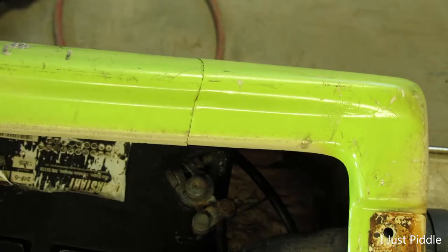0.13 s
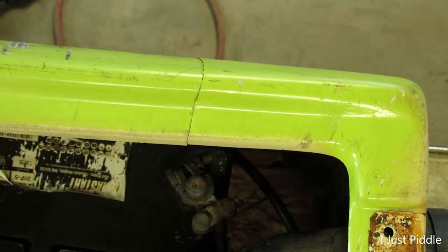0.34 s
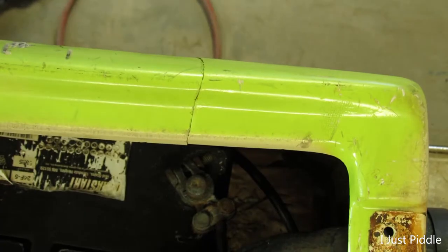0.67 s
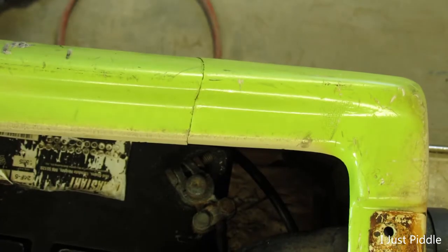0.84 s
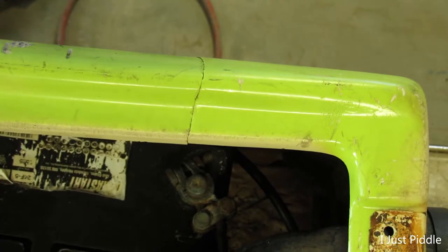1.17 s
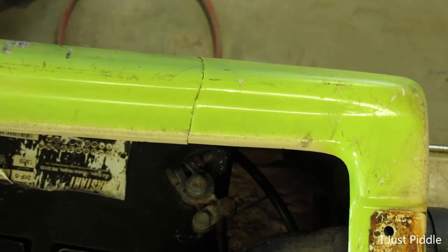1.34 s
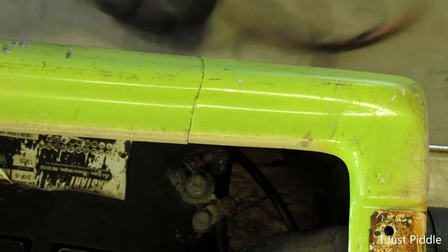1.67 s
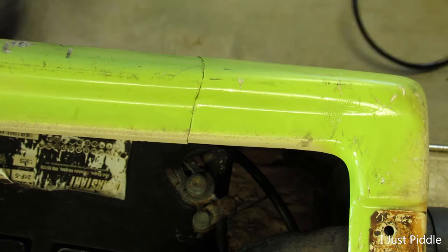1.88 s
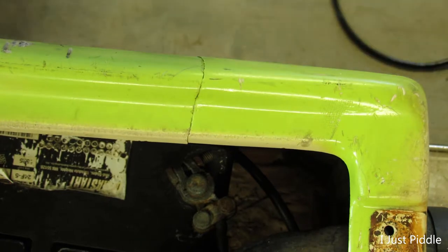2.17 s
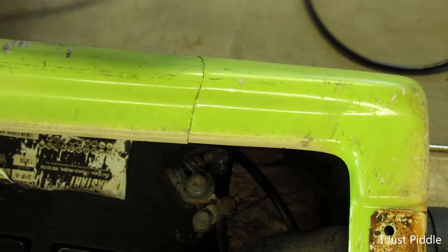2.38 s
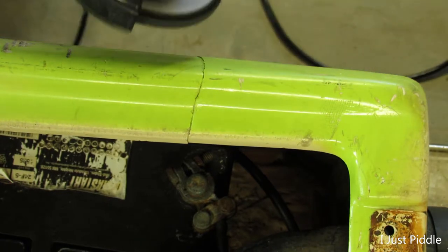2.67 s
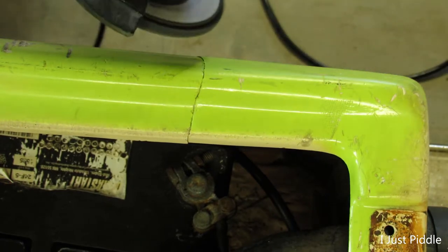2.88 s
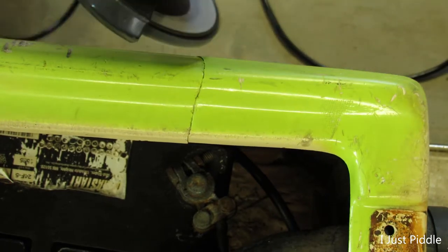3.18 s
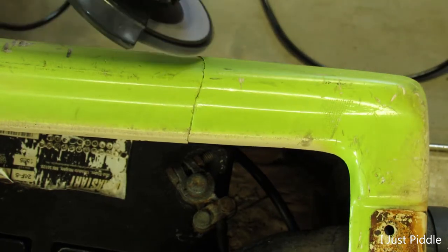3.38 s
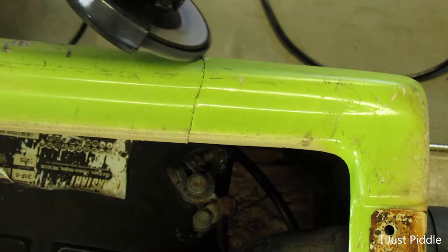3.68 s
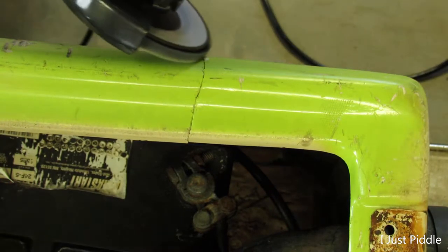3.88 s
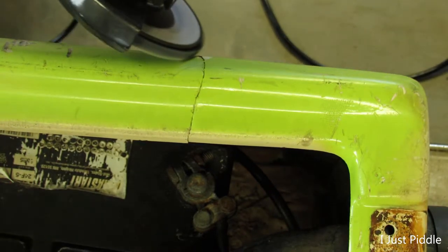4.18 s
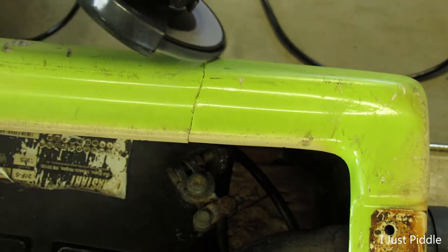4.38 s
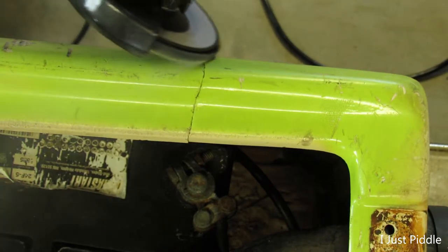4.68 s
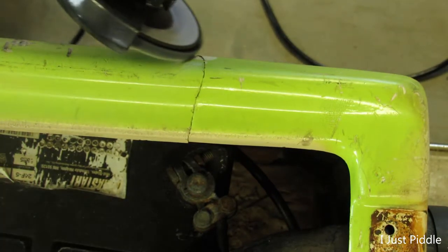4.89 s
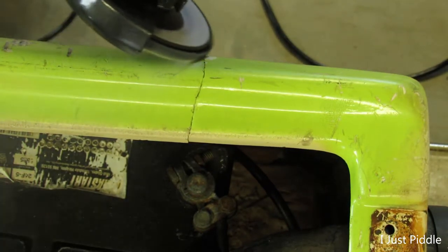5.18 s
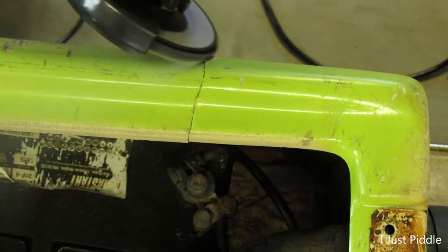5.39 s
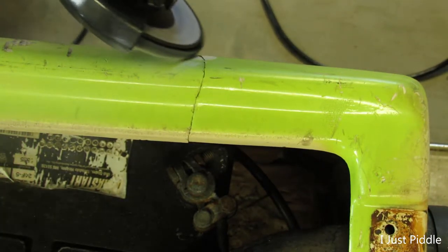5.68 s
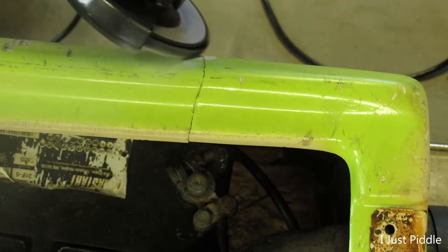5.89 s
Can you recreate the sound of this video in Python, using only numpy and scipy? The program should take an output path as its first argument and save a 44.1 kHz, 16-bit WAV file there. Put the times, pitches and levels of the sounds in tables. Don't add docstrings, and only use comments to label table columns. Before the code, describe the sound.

In a quiet humming workshop, cloth rustles and a tick falls, then an angle grinder kicks on, spins up roaring and grinds a fiberglass panel in short hissing strokes.

```python
import sys
import numpy as np
from scipy import signal
from scipy.fft import rfft, irfft
from scipy.io import wavfile
from scipy.ndimage import uniform_filter1d, map_coordinates

SR = 44100
rng = np.random.default_rng(int(sys.argv[2]) if len(sys.argv) > 2 else 0)


def to_wav(s):
    ch = np.atleast_2d(s).T
    pcm = np.round(np.clip(ch, -1, 1) * 32767)
    wavfile.write(sys.argv[1], SR, pcm.astype(np.int16))


def volts_from_db(level):
    exponent = np.asarray(level, float) / 20
    return 10 ** exponent


N = 266364
T = np.arange(N) / SR
SWITCH_S = .5267
MAINS_PULSES_HZ = 120
PINION_TEETH, GEARING = 12, 12 / 37


def rms_one(x):
    return x / np.sqrt(np.mean(x ** 2) + 1e-20)


def in_time(rows):
    s, *columns = np.transpose(rows)
    return [np.interp(T, s, c) for c in columns]


def at_hz(points, hz):
    points = np.array(points)
    return np.interp(np.log(hz), np.log(points[:, 0]), points[:, 1])


def ramp(start_s, length_s):
    return np.clip((T - start_s) / length_s, 0, 1)


def butter(x, order, hz, kind="low"):
    return signal.sosfilt(signal.butter(order, hz, kind, fs=SR, output="sos"), x)


def drift(rate_hz):
    r = np.exp(-2 * np.pi * rate_hz * 40 / SR)
    slow = signal.lfilter([1], [1, -2 * r, r * r], rng.standard_normal(N // 40 + 2002))
    slow = rms_one(slow[2000:])
    return np.interp(np.arange(N) / 40, np.arange(len(slow)), slow)


def swells(rows, edge=2):
    out = np.zeros(N)
    for s, half, db in rows:
        a, b = max(int((s - 3.5 * half) * SR), 0), int((s + 3.5 * half) * SR)
        out[a:b] += volts_from_db(db) * np.exp(-np.abs((T[a:b] - s) / half) ** edge)
    return out


def bursts(clicks, rise_s, fall_s):
    for s in (rise_s, fall_s):
        clicks = signal.lfilter([1], [1, -np.exp(-1 / (s * SR))], clicks + 1e-18)
    return clicks / (min(rise_s, fall_s) * SR)


def resonate(x, modes):
    out = 0
    for k, (hz, width_hz, db) in enumerate(modes):
        r = np.exp(-np.pi * width_hz / SR)
        b = (1 - r * r) / 2 * np.array([1, 0, -1])
        a = [1, -2 * r * np.cos(2 * np.pi * hz / SR), r * r]
        out = out + (-1) ** k * volts_from_db(db) * signal.lfilter(b, a, x)
    return out


# (frequency [Hz], likeness [0-1])
ALIKE = [(60, 0.69), (150, 0.49), (380, 1), (950, 0.99), (2380, 0.73), (5980, 0.88), (15000, 0.63)]
# (frequency [Hz], level [dB])
LEAN_DB = [(60, 0.0), (150, -13), (380, 6.5), (950, 0), (2380, 1.5), (5980, 1.5), (15000, 0)]


def coloured(colour_db, drive, patchy_db):
    noise = rng.standard_normal((2, len(drive))) * drive
    hz, s, (mid, side) = signal.stft(noise, SR, nperseg=1024)
    hz = np.maximum(hz, 10)[:, None]
    at = np.clip((s * SR).astype(int), 0, N - 1)
    gain = volts_from_db(colour_db(hz, at)) * np.ones(mid.shape)
    gain /= np.sqrt(np.mean(gain ** 2, axis=0))
    field = rng.standard_normal((60, 100))
    patches = map_coordinates(field, np.broadcast_arrays(5 * np.log2(hz / 10), 12 * s), order=1)
    alike = np.clip(at_hz(ALIKE, hz), 0, 1)
    lean = volts_from_db(at_hz(LEAN_DB, hz) / 2)
    mid, side = np.sqrt((1 + alike) / 2) * mid, np.sqrt((1 - alike) / 2) * side
    both = np.array([(mid + side) * lean, (mid - side) / lean]) * gain * volts_from_db(patchy_db * patches)
    return signal.istft(both, SR, nperseg=1024)[1][:, :len(drive)]


# (frequency [Hz], level [dB per Hz])
RUMBLE = [(20, -28), (45, -9), (84, -9), (120, -11.5), (167, -14), (200, -14.5), (270, -19.5), (756, -23.5),
          (1500, -24)]


def shop_hum():
    f = np.maximum(np.arange(N // 2 + 1) * SR / N, 1)
    shape = volts_from_db(at_hz(RUMBLE, f)) * (f < 1500)
    mid, side = (irfft(rfft(rng.standard_normal(N)) * shape, N) for k in range(2))
    rumble = volts_from_db(-62) * rms_one(mid + .47 * side * [[1], [-1]])
    ducked_db = -13 * ramp(.53, 0.047) - 4 * ramp(.6, 1.1)
    fridge_hz, fridge_db = 82, -66
    hum = volts_from_db(fridge_db + ducked_db / 4 + 0.59 * drift(12)) * np.sin(2 * np.pi * fridge_hz * T)
    return volts_from_db(ducked_db) * (rumble + hum * [[1.7], [1.2]])


def walls(x, t60, dull_hz):
    t = T[:SR // 2]
    tail = rng.standard_normal((2, len(t))) * volts_from_db(-60 * t / t60) * (t > .004)
    tail = butter(tail, 1, dull_hz)
    return signal.fftconvolve(x, tail / np.sqrt(np.sum(tail ** 2) / 2), axes=1)[:, :N]


# (centre [s], half length [s], rustle [dB], dull share [dB])
CLOTH_MOVES = [
    (0, .03, -53.5, 0),
    (.14, 0.032, -57, -10),
    (.308, .018, -52.5, -20),
    (0.497, 0.033, -52, 0.5),
]
# (frequency [Hz], level [dB per Hz])
CLATTER_COLOUR = [(180, -47), (300, -37), (723, -21), (818, -12), (1000, -6.5), (2340, 0.5), (5060, -6),
                  (12000, -30), (15600, -58), (22000, -120)]
# (frequency [Hz], level [dB per Hz])
RUSTLE_COLOUR = [(880, -42), (1500, -10), (2640, -21), (4040, -8), (8160, -4), (9010, -6), (10200, -9),
                 (16000, -17)]
# (time [s], peak [dB])
HAND_TICKS = [
    (0.2705, -31),
    (0.386, -52),
]


def hand():
    start_db, fall_db_per_s, rest_db = -46.5, 87, -73
    fading = volts_from_db(start_db - fall_db_per_s * T) + volts_from_db(rest_db)
    dull = fading + swells([(s, half, db + dull_db) for s, half, db, dull_db in CLOTH_MOVES])
    cloth = swells([row[:3] for row in CLOTH_MOVES]) + volts_from_db(-85)
    dull, cloth = dull * volts_from_db(0.86 * drift(60)), cloth * volts_from_db(1.3 * drift(80))
    clatter = coloured(lambda hz, at: at_hz(CLATTER_COLOUR, hz), dull[:SR], patchy_db=-1.0)
    rustle = coloured(lambda hz, at: at_hz(RUSTLE_COLOUR, hz), cloth[:SR], patchy_db=1.5)
    clicks = np.zeros(N)
    for s, db in HAND_TICKS:
        clicks[round(s * SR)] = volts_from_db(db - 7)
    tick = rng.standard_normal(N) * bursts(clicks, .0004, 0.0027)
    tick = signal.lfilter([.3, -.3], [1, -1.5, .6], tick)
    return (np.pad(clatter + rustle, [(0, 0), (0, N - SR)]) + tick) * (T < SWITCH_S)


# (octave centre [Hz], level [dB], t60 [s])
JOLT_BANDS = [
    (600, -43, .14),
    (1100, -35, .1),
    (2400, -22, .06),
    (4500, -26, .06),
]


def jolt():
    t = np.maximum(T - SWITCH_S, 0)[:SR]
    kick = 0
    for hz, db, t60 in JOLT_BANDS:
        noise = rng.standard_normal((2, SR)) + rng.standard_normal(SR)
        kick = kick + volts_from_db(db - 60 * t / t60) * rms_one(butter(noise, 2, [hz / 1.5, hz * 1.5], "band"))
    return np.pad(kick * (t > 0), [(0, 0), (0, N - SR)])


# (time [s], speed [turns/s])
ARMATURE_SPEED = [(.53, 172), (.655, 218), (.79, 327), (.9, 366), (1.02, 397), (1.15, 420), (1.32, 440),
                  (1.63, 464), (2.11, 481), (2.4, 488), (3.55, 497), (3.7, 489), (3.88, 488), (4.02, 478),
                  (4.23, 470), (4.75, 463), (5.15, 455), (6.04, 443)]


def armature():
    return in_time(ARMATURE_SPEED)[0]


def turns(per_s):
    return 2 * np.pi * np.cumsum(per_s) / SR


# (time [s], armature tone [dB], spindle tone [dB])
UNBALANCE_DB = [(.9, -49.5, -75), (1.15, -50, -70), (1.4, -47.5, -62), (1.75, -48, -59), (1.95, -48, -63.5),
                (2.45, -52.5, -66), (2.75, -52.5, -64), (3.2, -52, -60.5), (3.57, -51.5, -57),
                (4.0, -51.5, -62), (4.2, -48, -62), (4.3, -48.5, -61), (4.47, -46, -59.5), (4.8, -45, -60),
                (5.43, -48, -57.5), (5.5, -51.5, -59), (5.9, -53.5, -63), (6.04, -55, -61)]
# (centre [s], half length [s], loss [dB])
SPINDLE_STALLS = [
    (3.69, 0.052, 22),
    (3.925, .03, 9),
]
# (time [s], level [dB])
THIRD_ORDER_DB = [(1.0, -66), (2.0, -60), (3.5, -60), (4.1, -61), (4.5, -54), (5.0, -62), (5.5, -64),
                  (6.04, -65)]
# (centre [s], half length [s], level [dB])
DISC_WOBBLES = [(1.3, .15, -74), (2.28, 0.075, -73), (2.74, 0.064, -71), (3.14, .08, -72), (3.52, 0.1, -65),
                (3.82, .05, -71), (4.06, 0.15, -61.5), (4.45, .1, -63), (4.74, 0.057, -69),
                (5.08, 0.16, -67), (5.36, 0.14, -69), (5.8, 0.13, -75), (6.02, 0.07, -75)]


def shafts():
    motor = armature()
    spindle = turns(GEARING * motor)
    motor_db, once_db = in_time(UNBALANCE_DB)
    once_db = once_db - sum(db * np.exp(-((T - s) / half) ** 2) for s, half, db in SPINDLE_STALLS)
    fast = volts_from_db(motor_db + 0.2 + 0.68 * drift(14)) * np.sin(turns(motor)) * ramp(.61, 0.46) ** 2
    beat = turns((1 - 3 * GEARING) * motor)
    cancel_s = 4.35
    third = np.sin(turns(motor) - beat + np.interp(cancel_s, T, beat))
    fast -= volts_from_db(in_time(THIRD_ORDER_DB)[0]) * third * ramp(.9, .2)
    slow = volts_from_db(once_db - 1.4 + 1.2 * drift(7.7)) * np.sin(spindle)
    slow += (swells(DISC_WOBBLES) + volts_from_db(-79.5)) * volts_from_db(2.0 * drift(13)) * np.sin(2 * spindle)
    slow *= ramp(.8, 0.26)
    return np.sqrt(2) * (fast * volts_from_db([[1.2], [-1.2]]) + slow * volts_from_db([[1.4], [-1.4]]))


# (centre [s], half length [s], hiss [dB], flap note over its usual share [dB])
TOUCHES = [(3.61, 0.023, -21.5, -3), (3.692, 0.051, -26, -6), (3.87, 0.044, -41, -3),
           (3.941, 0.048, -25.5, -4), (4.07, 0.082, -30.5, -2), (4.13, 0.022, -26.5, 5),
           (4.214, 0.053, -30.5, -2), (4.319, 0.031, -27.5, 2.5), (4.374, 0.031, -26.5, -9),
           (4.44, 0.042, -28, -5), (4.513, 0.029, -24.5, 0), (4.699, 0.038, -22.5, -7),
           (4.773, 0.032, -25.5, -11), (4.862, 0.017, -34, 6), (5.066, 0.062, -27, -8),
           (5.216, 0.037, -29, 1), (5.384, 0.042, -25, -8), (5.44, 0.025, -24, -9),
           (5.525, 0.032, -27.5, 5), (5.656, 0.15, -30, -1), (5.81, 0.068, -23.5, -2),
           (5.92, 0.043, -31, -3)]
# (frequency [Hz], level [dB per Hz])
HISS_COLOUR = [(1500, -24), (3000, -5), (5500, 8), (8000, 8), (11000, 6.5), (13500, 1), (15000, 0),
               (16000, -1)]
# (frequency [Hz], width [Hz], level [dB])
DISC_MODES = [(7700, 90, -2), (9100, 80, 0), (9700, 80, -3), (10300, 90, 1), (10900, 80, -4),
              (11400, 110, -2), (12800, 100, -4)]
# (frequency [Hz], centre [s], half length [s], level over hiss [dB])
DISC_SINGING = [(9200, 3.62, .025, 0), (10400, 3.62, .025, 0), (9600, 3.2, .02, 1), (12750, 3.71, .03, -3),
                (9050, 3.95, .04, 2.5), (12700, 3.925, .02, -1), (7300, 3.95, .05, 0),
                (9200, 4.11, .025, 1), (12300, 4.8, .025, 1), (12100, 4.315, .025, 2),
                (10550, 4.36, .04, -2), (7250, 6.3, .06, 0), (12200, 3.4, .04, 2), (12200, 5.1, .03, -1),
                (10500, 4.69, 0.023, -4), (10200, 4.78, .03, -1), (11900, 4.87, .015, 2),
                (12000, 5.055, .015, 1), (9300, 5.07, .05, -3), (10400, 5.09, .03, 1),
                (9050, 5.39, 0.023, 1), (10100, 5.44, .03, -1), (11800, 5.5, .07, 0), (11500, 5.82, .05, 2),
                (9900, 9.5, .07, 0)]


def disc():
    first_touch_s, graze_db, flaps = 3.55, -38, 80
    grit_db, note_db, sing_db, pattern_db = -3, -8, -11, -13
    spell_width_hz, spell_db = 160, 10
    press = swells([row[:3] for row in TOUCHES], edge=1.7) + volts_from_db(graze_db)
    flap = swells([(s, half, db + over_db) for s, half, db, over_db in TOUCHES], edge=3.0)
    spin = turns(GEARING * armature())
    flecks = (rng.random(N) < 250 / SR) * volts_from_db(3.5 * np.minimum(rng.exponential(1, N), 4))
    wobble = volts_from_db(0.53 * np.sin(2 * spin) + 0.49 * drift(60) + 0.3 * drift(30))
    wobble *= 1 + 0.2 * bursts(flecks, .0003, 0.00027)
    hiss = volts_from_db(grit_db) * press * coloured(lambda hz, at: at_hz(HISS_COLOUR, hz), wobble, patchy_db=2.5)
    uneven = butter(rng.standard_normal((2, 2, N)), 2, 300)
    note = rms_one(uneven[0] * np.sin(flaps * spin) + uneven[1] * np.cos(flaps * spin))
    web = 0
    for mode in DISC_MODES:
        web = web + volts_from_db(3 * drift(10)) * resonate(rng.standard_normal((2, N)) * wobble, [mode])
    grains = rng.standard_normal((2, 180))
    place = spin / (2 * np.pi) % 1 * 180
    where = [np.arange(2)[:, None] + 0 * T, place + np.zeros((2, 1))]
    rim = map_coordinates(grains, where, order=1, mode="grid-wrap")
    rim = butter(rim + 0.23 * rim[::-1], 2, [7000, 13000], "band")
    hiss += volts_from_db(pattern_db + 2.0 * drift(17)) * press * rms_one(rim)
    sing = volts_from_db(note_db + 1.9 * drift(40)) * flap * note + volts_from_db(sing_db) * press * rms_one(web)
    grit = rng.standard_normal((2, N)) * press * volts_from_db(spell_db)
    for hz, s, half, db in DISC_SINGING:
        a, b = int((s - 3 * half) * SR), int((s + 3 * half) * SR)
        struck = grit[:, a:b] + grit[::-1, a:b] / 4
        sing[:, a:b] += swells([(s, half, db)])[a:b] * resonate(struck, [(hz, spell_width_hz, 0)])
    return ramp(first_touch_s, 0.082) * (hiss + sing + 0.022 * sing[::-1])


# (time [s], rate [knocks/s])
RATTLE_RATE = [(.5, 60), (1.0, 63), (1.5, 62), (2.0, 70), (2.4, 45), (3.2, 47), (3.6, 68), (4.3, 72),
               (4.9, 62), (5.5, 72), (6.04, 70)]
# (time [s], peak [dB])
HARD_KNOCKS = [(0.5965, -19), (.6216, -25), (0.6374, -23), (0.651, -20), (0.712, -16), (0.723, -24),
               (0.744, -20), (0.753, -19), (0.7856, -13.5), (.7967, -27), (.8202, -15), (0.834, -22),
               (0.872, -22), (0.9213, -13),
               (0.948, -15), (1.0095, -12), (1.0287, -10.5), (1.044, -10.5), (1.0606, -12), (1.089, -13),
               (1.105, -16), (1.122, -13), (1.137, -12), (1.2048, -17), (1.2496, -11.5), (1.293, -15),
               (1.308, -15), (1.3459, -16), (1.3624, -13), (1.3786, -10.5), (1.413, -15), (1.4326, -14),
               (1.4877, -14), (1.5054, -20), (1.5624, -20), (1.655, -22), (1.6752, -16), (1.729, -15),
               (1.7552, -11.5), (1.772, -14), (1.788, -14), (1.8054, -21), (1.84, -18), (1.8533, -17),
               (1.8793, -11), (1.905, -15), (1.921, -18), (1.937, -13), (1.955, -11), (1.982, -14.5),
               (2.0092, -13), (2.0532, -22), (2.0776, -12), (2.099, -13), (2.123, -14), (2.1361, -14),
               (2.1705, -14), (2.183, -13), (2.195, -12), (2.2297, -14), (2.253, -12), (2.271, -15),
               (2.2907, -15), (2.3119, -9.5), (2.347, -13), (2.3708, -10.5), (2.399, -13), (2.4165, -24),
               (2.4355, -24), (2.4547, -13), (2.4805, -9), (2.5058, -16), (2.5296, -13), (2.558, -20),
               (2.558, -15), (2.581, -15), (2.664, -12.5), (2.7145, -15), (2.731, -11.5), (2.7561, -10.5),
                 (2.7762, -20), (2.9827, -10.5), (3.0023, -19), (3.045, -18), (3.0632, -23), (3.0896, -18),
                 (3.1151, -18), (3.1345, -16), (3.176, -14), (3.1945, -15), (3.2159, -18), (3.2837, -12.5),
                 (3.3313, -15), (3.346, -17), (3.37, -12), (3.406, -14), (3.464, -17), (3.7048, -22),
                 (3.8527, -10.5), (3.916, -19), (4.017, -9), (4.0959, -16), (4.1722, -20), (4.1889, -11.5),
                 (4.2952, -11), (4.3241, -12), (4.3536, -13), (4.3817, -12), (4.478, -12), (4.5355, -16),
                 (4.561, -16), (4.579, -16), (4.6544, -17), (4.6686, -16), (4.7316, -9), (4.8193, -12.5),
                 (4.8872, -12), (4.905, -16), (4.94, -12), (5.0407, -18), (5.122, -12.5), (5.138, -14),
                 (5.2037, -19), (5.2362, -19), (5.264, -21), (5.28, -14), (5.4388, -13), (5.495, -15),
                 (5.52, -14), (5.538, -12), (5.6215, -22), (5.7257, -14), (5.773, -12.5), (5.9721, -17)]


def backlash(roar_db, rattle_db):
    loose_from_s, keep_clear_s = 1.0, .009
    cycles = np.cumsum(in_time(RATTLE_RATE)[0]) / SR + .22 * drift(25)
    closing = np.diff(np.floor(np.maximum.accumulate(cycles)), prepend=0) > 0
    chance_db = 2.0 * np.clip(rng.standard_normal(N), -3, 1.5)
    loose = closing * (T > loose_from_s) * volts_from_db(roar_db + rattle_db + 8.0 + chance_db)
    pulses, slip_s, slip_pulses = 56, .0038, 2.5
    kick_db, settled_db, settle_s, uneven_db, fade_db_per_s = -5, -15, 0.018, 1.6, 42
    k = np.arange(pulses)
    late_s = k / MAINS_PULSES_HZ + slip_s * (1 - np.exp(-k / slip_pulses))
    chance = np.clip(rng.standard_normal(pulses), -2, 1)
    settled = 1 - np.exp(-late_s / settle_s)
    pulse_db = kick_db + settled * (settled_db - kick_db + uneven_db * chance)
    pulse_db -= fade_db_per_s * np.minimum(late_s, .2)
    run_up = np.transpose([SWITCH_S + late_s, pulse_db])
    hard = np.array(HARD_KNOCKS)
    hits = np.bincount(np.round(hard[:, 0] * SR).astype(int), minlength=N)
    loose *= uniform_filter1d(1. * hits, size=round(2 * keep_clear_s * SR)) < 1e-9
    knocks = np.vstack([run_up, hard])
    loose[np.round(knocks[:, 0] * SR).astype(int)] = volts_from_db(knocks[:, 1] - 2.5)
    return bursts(loose, 0.00039, 0.0014)


# (time [s], roar [dB])
ROAR_DB = [(0.56, -31.5), (0.8, -30), (1.18, -26), (1.49, -24), (1.7, -24.5), (2.4, -26), (2.47, -28.5),
           (2.61, -25), (3.06, -24.5), (3.63, -23), (3.76, -26), (3.87, -23), (3.98, -28.5), (4.13, -25),
           (4.59, -28), (5.41, -27), (5.63, -28), (6.04, -28.5)]
# (time [s], nearness [0-1], vents toward the microphones [dB], slack in the gears [dB])
TOOL_HANDLING = [(.52, 0, -6, -4), (.8, 0.4, 8, -6), (.95, 0.23, 2.5, 2), (1.25, 0.23, -0.5, -4),
                 (1.5, 0.36, -7, -1.5), (1.9, 0.03, -2, -2), (2.15, 0.08, 0.5, -4), (2.4, 0.99, 4, -4),
                 (3.0, 1, 2.5, -1.5), (4.0, 1, -4.5, -5), (4.5, 0.95, -3.5, 0.5), (5.5, 0.96, 5, -0.5),
                 (6.04, 1, -2, -2.5)]
# (frequency [Hz], level [dB per Hz])
COLOUR_SLOW = [(120, -68), (200, -30), (538, -14), (1350, -13), (1560, -4.5), (2560, 4.5), (3490, 0),
               (4040, 4.5), (6640, -2), (7830, -3.5), (9580, -9), (12200, -12.5), (16000, -29)]
# (frequency [Hz], level [dB per Hz])
COLOUR_FAR = [(120, -66), (200, -38), (394, -19), (456, -20), (500, -14.5), (558, -16), (899, -10.5),
              (1080, -14.5), (1590, 0), (2150, -3.5), (3200, -2.5), (3900, -3), (4680, -3), (5230, -2.5),
              (7830, 0), (9400, -4), (11800, -2), (14300, -11.5), (16000, -18)]
# (frequency [Hz], level [dB per Hz])
COLOUR_NEAR = [(200, -32), (370, -23.5), (480, -17), (560, -16), (1100, -6), (1560, -8.5), (2100, -5),
               (2500, 0), (3450, 1.5), (3900, -6.5), (4300, -2.5), (5800, -1.5), (10500, -7.5), (12200, -8),
               (13200, -13), (16000, -22)]
# (frequency [Hz], level [dB per Hz])
KNOCK_COLOUR = [(800, -31), (1800, -21), (2600, 3.5), (3800, -11.5), (4800, 4.5), (5800, 3), (7900, 3.5),
                (9500, -6.5), (16000, -10)]
# (frequency [Hz], width [Hz], level [dB])
HOUSING_MODES = [(2400, 450, -11), (4320, 110, -10), (5850, 170, -9), (6300, 250, -15), (7750, 160, -8)]
# (frequency [Hz], width [Hz], centre [s], half length [s], level over roar [dB])
HOUSING_SINGING = [(7750, 110, .72, .05, 6), (7750, 110, .85, .15, 5), (2300, 300, .598, .006, 12),
                   (2600, 250, .652, .012, 10), (7750, 130, 1.05, .06, 4), (4320, 80, .95, .12, 3),
                   (4320, 80, 1.5, .15, 0), (4320, 80, 2.3, .1, 3), (5150, 80, 1.55, .12, 2),
                   (5380, 90, 1.45, .1, 3), (5850, 150, 1.87, .14, 4), (5880, 140, 2.35, .16, 5),
                   (3250, 160, 1.62, .13, 2), (12000, 400, .8, .06, -6), (12000, 300, 1.03, .05, -3),
                   (11900, 500, 1.2, .06, -3)]
# (frequency [Hz], width [Hz], level [dB])
MESH_PEAKS = [(2000, 200, -6), (2550, 200, 14), (3000, 200, 1), (3500, 300, 1), (4150, 230, 8),
              (4700, 200, -8), (5300, 170, 5), (5600, 90, -5), (5900, 200, -2)]
# (centre [s], half length [s], level over roar [dB])
BLADE_NOTE = [
    (.725, .02, -10),
    (.78, .03, -22),
    (.925, .035, -14),
    (1.09, .05, -18),
]


def grinder():
    roar_db, = in_time(ROAR_DB)
    near, top_db, rattle_db = in_time(TOOL_HANDLING)
    motor = armature()
    near, on = np.clip(near, 0, 1), ramp(.523, .004)
    slow = np.clip((420 - motor) / 90, 0, 1)
    gathering = np.clip((460 - motor) / 60, 0, 1)

    def by_nearness(far_db, near_db):
        return far_db + near * (near_db - far_db)

    throb_db = slow * 2 + (1 - slow) * by_nearness(.6, .3)
    ring_db = by_nearness(1, -6) - 12 * np.clip((280 - motor) / 90, 0, 1)
    mesh_hz = PINION_TEETH * motor
    favour_db = sum(db * np.exp(-((mesh_hz - hz) / width) ** 2) for hz, width, db in MESH_PEAKS)
    whine_db = by_nearness(-17, -16.5) + (1 - 0.59 * ramp(2.6, 1)) * favour_db
    pulse = np.cos(2 * np.pi * MAINS_PULSES_HZ * (T - .5312))
    drive = volts_from_db(throb_db * pulse + 0.5 * np.sin(turns(GEARING * motor)) + 1.06 * drift(150))
    drive /= np.sqrt(uniform_filter1d(drive ** 2, size=4000))
    force = volts_from_db(roar_db - 1.5) * drive * on
    knocks = backlash(roar_db, rattle_db) * on

    def colour(hz, at):
        running = (1 - near[at]) * at_hz(COLOUR_FAR, hz) + near[at] * at_hz(COLOUR_NEAR, hz)
        top = top_db[at] * np.clip(np.log2(hz / 6500), 0, 1)
        return slow[at] * at_hz(COLOUR_SLOW, hz) + (1 - slow[at]) * running + top

    roar = coloured(colour, force + (0.13 + 0.66 * slow) * knocks, patchy_db=1.1)
    clack = coloured(lambda hz, at: at_hz(KNOCK_COLOUR, hz), knocks, patchy_db=0.0) * (1 - .5 * slow)
    ring = resonate(rng.standard_normal(N) * (force + 1.53 * knocks), HOUSING_MODES) * volts_from_db(ring_db + 9.5)
    shaking = rng.standard_normal(N) * (force + 1.5 * knocks) * volts_from_db(1.5)
    for hz, width, s, half, db in HOUSING_SINGING:
        ring += swells([(s, half, db)]) * resonate(shaking, [(hz, width, 0)])
    smear_running_rad, smear_run_up_rad = 1.4, 1.0
    smear_rad = smear_running_rad + gathering * (smear_run_up_rad - smear_running_rad)
    mesh = PINION_TEETH * turns(motor) + smear_rad * drift(90)
    mesh_force = (.7 + .4 * gathering) * force + (1.5 - .5 * gathering) * knocks
    whine = volts_from_db(whine_db + 6 + (3 - 1.5 * gathering) * drift(25)) * mesh_force * np.sin(mesh)
    fan_order = 36.9
    blades = swells(BLADE_NOTE) * force * np.sin(fan_order * turns(motor) + .8 * drift(60))
    return roar + clack + ring + whine + blades


# (time [s], left over right [dB])
TOOL_BEARING = [(0.55, 3), (0.64, 3), (1.63, -2), (2.29, 1), (3.8, 0.5), (5.94, 0.5), (6.0, 0.5)]


def scene():
    tool = butter(grinder() + disc() + jolt(), 4, 190, "high")
    tool = tool * volts_from_db((in_time(TOOL_BEARING)[0] - .6) / 2 * np.array([[1], [-1]]))
    return tool + volts_from_db(-12.0) * walls(tool, t60=0.49, dull_hz=6500) + shafts() + hand() + shop_hum()


def band_limit(x):
    return signal.sosfilt(signal.butter(12, 15740, fs=SR, output="sos"), x)


def record(dry):
    rounding = butter(.55 * np.tanh(dry / .55) - dry, 2, 300, "high")
    steep = signal.cheby2(20, 70, 16580, fs=SR, output="sos")
    cut = signal.sosfilt(steep, dry + rounding)
    mic_hiss = volts_from_db(-63) * butter(rng.standard_normal(dry.shape), 2, [1500, 11000], "band")
    return band_limit(cut + mic_hiss)


dry = scene()
out = record(dry)
to_wav(out)
```